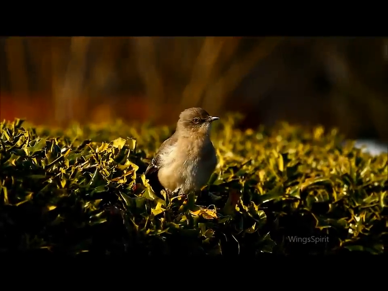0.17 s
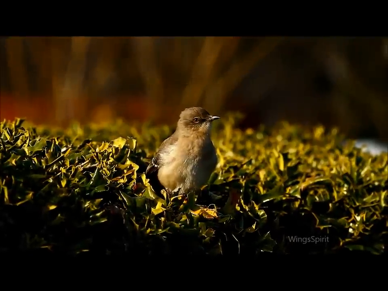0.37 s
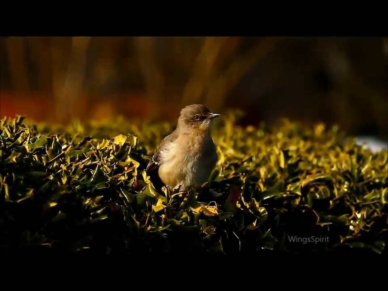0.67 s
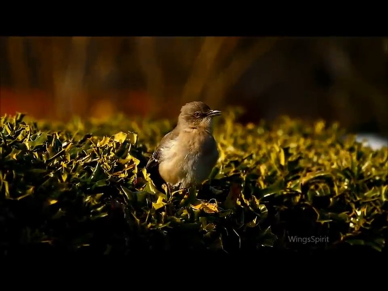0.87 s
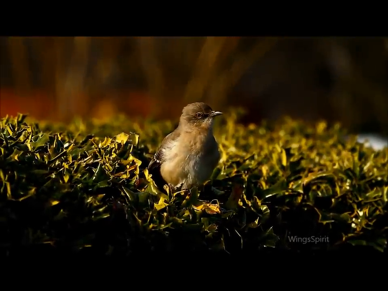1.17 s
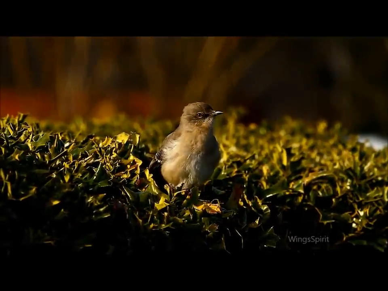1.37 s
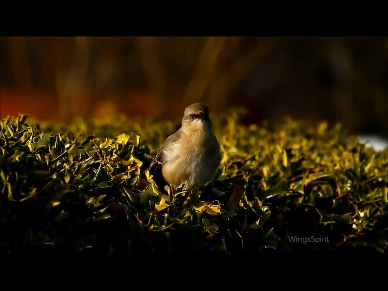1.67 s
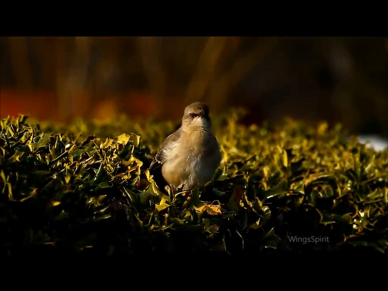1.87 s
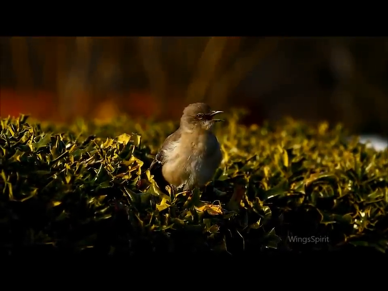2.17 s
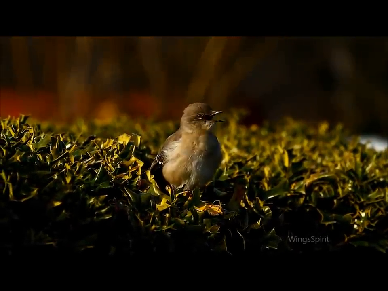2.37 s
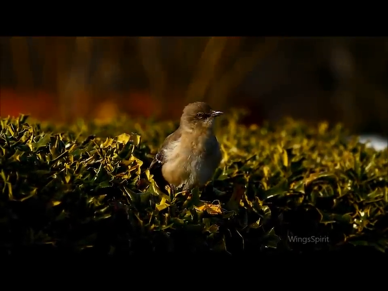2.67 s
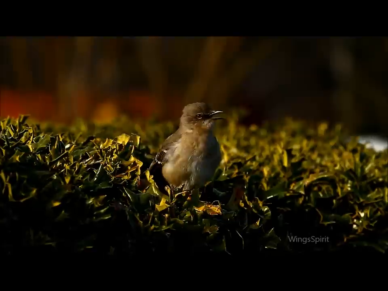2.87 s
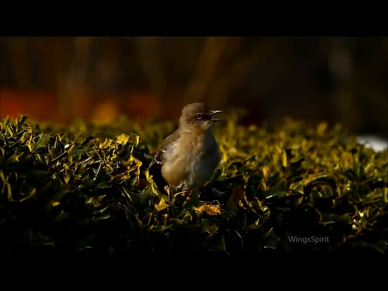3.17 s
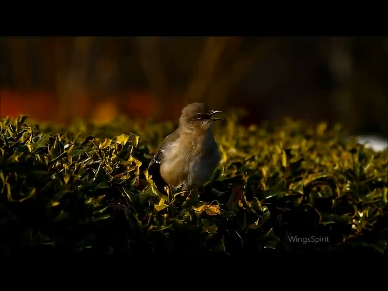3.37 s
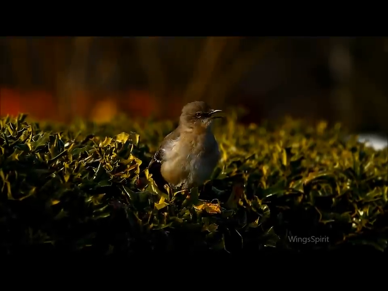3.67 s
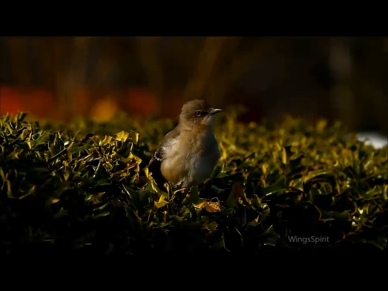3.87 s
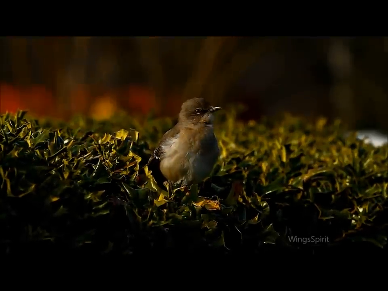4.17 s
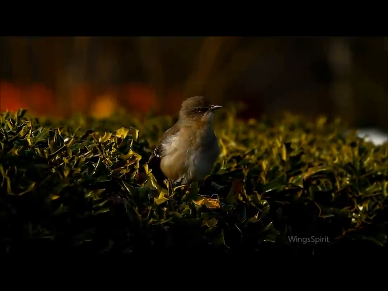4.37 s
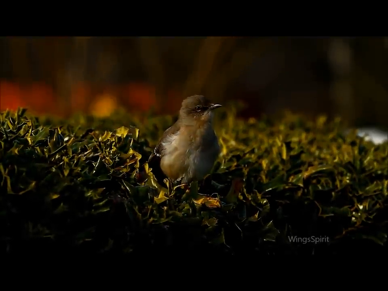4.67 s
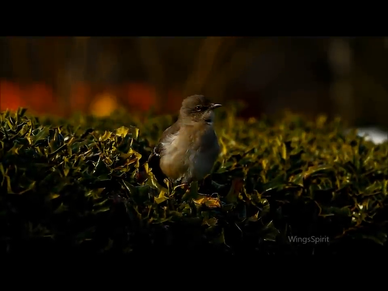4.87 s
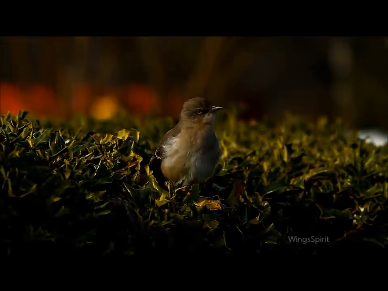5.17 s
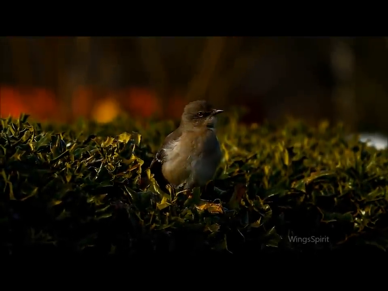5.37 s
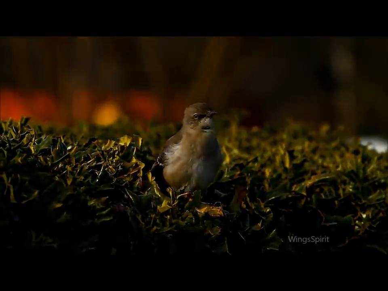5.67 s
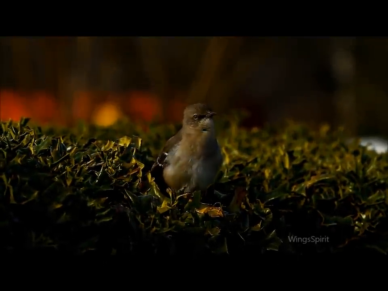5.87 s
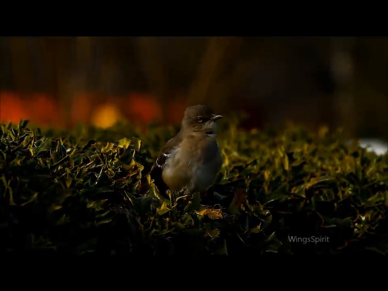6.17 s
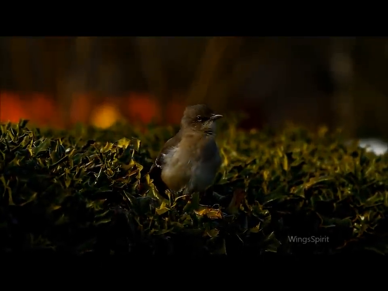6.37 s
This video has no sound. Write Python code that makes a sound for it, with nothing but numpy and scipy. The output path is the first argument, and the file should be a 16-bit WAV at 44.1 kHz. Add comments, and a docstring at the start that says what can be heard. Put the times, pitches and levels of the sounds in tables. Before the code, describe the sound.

A mockingbird perched on a hedge sings close to the microphone. Five sharp chips, mixed with two mellow whistles, give way to quick groups of high pips, most ending in a falling slur. Two low buzzes, soft low notes answered by warbles, and two throbbing trills follow, much quieter. Distant traffic rumbles and slowly recedes; a few dull bumps shake the microphone. Open air, slight leafy reflections.

```python
"""Distant traffic rumbles as filtered noise and slowly recedes while a mockingbird on top of a hedge sings:
gliding harmonic tones form sharp chips and two mellow whistles. A few soft bumps, decaying cosines, shake
the microphone, noise ticks snap among the twigs and a thin sine whistle sounds briefly above the song.
Runs of high pips and slurs follow, then low buzzes, soft notes with warbles, and trills.
Dying clouds of reflections from leaves and trees, and one from the ground, trail each note."""
import sys
import numpy as np
from scipy import signal
from scipy.fft import rfft, irfft
from scipy.io import wavfile
from scipy.ndimage import uniform_filter1d

SR = 44100
rng = np.random.default_rng(int(sys.argv[2]) if len(sys.argv) > 2 else 0)


def unload_audio(sound):
    """Save the sound as a 16-bit wav file, at the path given as the first command line argument."""
    columns = np.transpose(np.atleast_2d(sound))
    # keep every value between -1 and 1, then stretch to whole-number steps
    steps = np.round(np.clip(columns, -1, 1) * 32767)
    wavfile.write(sys.argv[1], SR, steps.astype(np.int16))


N = 287532
CUTOFF_HZ = 15700   # upper limit of the overtones and of the whole sound

# overtone strength after throat and beak, in the high notes; each note adds its own overtone gain:
# (frequency [Hz], gain relative to the fundamental [dB])
HIGH_OVERTONES = [(7500, -14.5), (9000, -19.5), (10200, -30.5), (12000, -30.5), (14000, -16.5),
                  (15300, -38)]
# the same for the low notes and warbles: (frequency [Hz], gain relative to the fundamental [dB])
LOW_NOTE_OVERTONES = [(4000, -34), (6500, -35), (9300, -38), (10900, -22), (12400, -33), (14000, -24),
                      (16000, -31)]


def from_db(db):
    """Logarithmic level: 20 dB is a factor of ten in amplitude."""
    return 10 ** (np.asarray(db) / 20)


def rms_one(x):
    """Normalisation of the mean power to one."""
    return x / np.sqrt(np.mean(x ** 2) + 1e-20)


def in_time(rows):
    """Linear interpolation: each column of a curve at every sample."""
    s, *columns = np.transpose(rows)
    return [np.interp(np.arange(N) / SR, s, column) for column in columns]


def drift(rate, size):
    """Low-passed random fluctuation: noise averaged twice over 1/rate seconds, with spread 1."""
    width = max(2, int(SR / rate))
    noise = rng.standard_normal(size + SR)
    slow = uniform_filter1d(uniform_filter1d(noise, width), width)
    return rms_one(slow)[SR // 2:SR // 2 + size]


def coloured_noise(spectrum):
    """Spectral shaping: white noise weighted in frequency, then scaled to rms 1."""
    table_hz, table_db = np.transpose(spectrum)
    hz = np.maximum(np.fft.rfftfreq(N, 1 / SR), 1)
    octaves_outside = np.abs(np.log2(hz / np.clip(hz, table_hz[0], table_hz[-1])))
    # beyond the table the spectrum falls by 24 dB per octave
    gain_db = np.interp(np.log(hz), np.log(table_hz), table_db) - 24 * octaves_outside
    return rms_one(irfft(rfft(rng.standard_normal(N)) * from_db(gain_db), N))


def add(out, t, sound):
    """Superposition: mix a sound in at its sample times."""
    at = np.round(t * SR).astype(int)
    inside = (at >= 0) & (at < N)
    out[at[inside]] += sound[inside]


def sample_times(start, end):
    """Uniform sampling of the time between two moments."""
    first = int(start * SR)
    return np.arange(first, max(int(end * SR), first + 2)) / SR


def envelope_db(t, attack, release, depth_db=20):
    """Amplitude envelope: attack, hold and release, in dB relative to the full level."""
    missing_attack = np.maximum(1 - (t - t[0]) / attack, 0)
    missing_release = np.maximum(1 - (t[-1] - t) / release, 0)
    return -depth_db * (missing_attack ** 2 + missing_release ** 2)


def near(hz, centre_hz, width_hz):
    """Gaussian resonance weight: 1 at a pitch, falling to 0 on both sides."""
    return np.exp(-((hz - centre_hz) / width_hz) ** 2)


def arch(s, top_hz, level_db, half, droop, fade_db, lean_db=0, flatness=2.53, shoulder=0.91):
    """Pressure-driven pitch: one push of air lifts pitch and loudness in a round arch; gives times, Hz, dB."""
    t = sample_times(s - half, s + half)
    place = (t - s) / half   # -1 to 1
    away = np.tanh((np.abs(place) / shoulder) ** flatness)
    hz = top_hz * (1 - droop * away)
    db = level_db - fade_db * np.abs(place) ** 1.6 - lean_db * place ** 3   # positive lean: louder on the rise
    return t, hz, db


def syrinx(hz, level_db, overtones, beak_db, jitter, shimmer_db, mistuning_db=0):
    """Source and filter: an unsteady membrane's overtones slide through throat resonances and out of the beak."""
    size = len(hz)
    hz = uniform_filter1d(hz, size=96, mode="nearest") * (1 + jitter * drift(1660, size))
    phase = 2 * np.pi * np.cumsum(hz) / SR
    tone = np.sin(phase) * from_db(-mistuning_db)   # the fundamental weakens as it leaves the throat's tuning
    for k in range(2, 9):
        overtone_db = beak_db + np.interp(k * hz, *np.transpose(overtones))
        tone += from_db(overtone_db) * np.sin(k * phase) * (k * hz < CUTOFF_HZ)
    edges = signal.windows.tukey(size, min(1, .004 * SR / size))   # 2 ms fade at each end
    return np.sqrt(2) * tone * edges * from_db(level_db + shimmer_db * drift(203, size))


def traffic(rumble_gain_db=3, roar_gain_db=0.5, waver_hz=8):
    """Broadband and narrowband noise: engine rumble with two wavering drones, under a broad roar of tyres."""
    # levels before the two gains are added: (time [s], rumble level [dB], tyre roar level [dB])
    traffic_levels = [(0.0, -33.5, -31.5), (1.07, -35.5, -34), (1.72, -40, -34.5), (2.63, -43.5, -37),
                      (3.19, -42, -37), (3.72, -44.5, -39), (4.34, -41, -37.5), (6.36, -47.5, -43.5),
                      (6.52, -46.5, -42.5)]
    # engine noise spectrum: (frequency [Hz], relative density [dB per Hz])
    rumble_spectrum = [(28, -12), (45, -10.5), (70, -6), (110, 2), (140, -3), (175, 0.5), (230, -5.5),
                       (300, -10.5), (400, -15.5)]
    # tyre noise spectrum: (frequency [Hz], relative density [dB per Hz])
    roar_spectrum = [(200, -10), (330, -3), (550, -0.5), (850, 2.5), (1200, -1), (1700, -5), (2400, -14),
                     (3300, -20), (5000, -25.5), (8000, -35), (12000, -35), (15500, -40.5)]
    # engine notes within the rumble: (frequency [Hz], level relative to the rumble noise [dB])
    engine_notes = [(110, -11), (170, -17.5)]
    rumble_db, roar_db = in_time(traffic_levels)
    engines = coloured_noise(rumble_spectrum)
    for hz, db in engine_notes:
        phase = 2 * np.pi * hz * np.arange(N) / SR
        # independent slow sine and cosine parts make a narrow band of noise
        engines += from_db(db) * (drift(waver_hz, N) * np.sin(phase) + drift(waver_hz, N) * np.cos(phase))
    rumble = from_db(rumble_db + rumble_gain_db + 1.25 * drift(6.6, N)) * engines
    roar = from_db(roar_db + roar_gain_db + 0.18 * drift(14.7, N)) * coloured_noise(roar_spectrum)
    return rumble + roar


def chips(swell_s=.006, closing_db_per_s=350, under_ratio=.72, under_db=-13, under_s=0.0076):
    """Rapid frequency sweep: up over two octaves, then down louder as the beak closes, briefly in two voices."""
    # the chips, end pitch before the sag: (time of the top [s], top pitch [Hz], end pitch [Hz], level [dB],
    # upsweep below that level [dB], overtone gain [dB])
    chip_notes = [(0.063, 6300, 3430, -17, 7, -7), (0.347, 6670, 4000, -11.5, 14.5, -6.5),
                  (0.755, 6440, 3640, -13, 11, -5.5), (1.2532, 6340, 3730, -14, 9, -5.5),
                  (1.56, 6280, 3610, -15.5, 13, -7)]
    # throat and beak: (frequency [Hz], gain relative to the fundamental before the overtone gain [dB])
    chip_overtones = [(6000, -19), (8000, -0.5), (10000, -20), (11500, -4), (13200, -1), (14500, -35),
                      (16000, -51)]
    lead_s, tail_s = .018, 0.028   # heard before and after the top
    rise_s, settle_s, sag_hz_per_s = .0115, .0068, 7100
    out = np.zeros(N)
    for s, top_hz, end_hz, level_db, softer_db, beak_db in chip_notes:
        t = sample_times(s - lead_s, s + tail_s)
        before, after = np.maximum(s - t, 0), np.maximum(t - s, 0)
        height = np.exp(-(after / settle_s) ** 1.22) - (before / rise_s) ** 1.4
        hz = end_hz * (top_hz / end_hz) ** height - sag_hz_per_s * after
        swell_db = -softer_db * (1 - np.minimum(after / swell_s, 1) ** 2)
        db = level_db + swell_db + envelope_db(t, attack=0.012, release=0.034)
        closing_db = beak_db - closing_db_per_s * after
        add(out, t, syrinx(hz, db, chip_overtones, closing_db, jitter=.028, shimmer_db=1.6))
        # the other side of the syrinx falls below the first
        both = (t > s) & (t < s + under_s)
        db = level_db + under_db + envelope_db(t[both], attack=0.001, release=0.0014)
        under_hz = under_ratio * hz[both]
        add(out, t[both], syrinx(under_hz, db, chip_overtones, beak_db, jitter=.028, shimmer_db=1.6))
    return out


def rasp(voice, level_db):
    """Flow turbulence: noise in the syrinx follows the strength of the note."""
    # turbulence spectrum: (frequency [Hz], relative density [dB per Hz])
    rasp_spectrum = [(3000, -5), (6000, -6), (9000, -3), (11000, -12), (13500, -3.5), (15500, -10)]
    strength = np.sqrt(np.abs(uniform_filter1d(voice ** 2, size=128)))
    return strength * from_db(level_db) * coloured_noise(rasp_spectrum)


def scatter(x, delay, t60, level_db):
    """Diffuse reverberation: a cloud of small reflections dies exponentially."""
    t = np.arange(SR) / SR
    echoes = rng.standard_normal(SR) * np.exp(-np.log(1000) * t / t60) * (t > delay)
    unit_energy = echoes / np.sqrt(np.sum(echoes ** 2) + 1e-20)
    return from_db(level_db) * signal.fftconvolve(x, unit_energy)[:N]


def ground_echo(x, delay, level_db):
    """Specular reflection: the ground returns one delayed, weaker copy."""
    return from_db(level_db) * np.interp(np.arange(N) - delay * SR, np.arange(N), x, left=0)


def bumps(low_hz=38, soft_hz=370):
    """Damped oscillation: a dull tap and a few cycles of ringing on the microphone."""
    # knocks, levels before the filters: (time [s], starting level [dB], pitch [Hz], 60 dB decay time [s])
    knocks = [(0.492, -16, 139, 0.057), (0.61, -8.5, 88, 0.037), (0.619, -27, 172, .03),
              (0.671, -18, 238, 0.057), (0.685, -9, 197, 0.034), (0.812, -18.5, 60, 0.06),
              (0.843, -25, 55, .07), (1.049, -9, 154, 0.025), (3.95, -19.5, 155, 0.046),
              (4.05, -17.5, 94, 0.06), (4.061, -15.5, 182, 0.048), (4.393, -20.5, 71, 0.033),
              (4.655, -25.5, 147, 0.097)]
    out = np.zeros(N)
    for s, db, hz, t60 in knocks:
        t = sample_times(s, s + 2 * t60)
        decay = np.exp(-np.log(1000) * (t - s) / t60)
        add(out, t, from_db(db) * decay * np.cos(2 * np.pi * hz * (t - s)))
    out = signal.sosfilt(signal.butter(2, low_hz, "high", fs=SR, output="sos"), out)
    return signal.sosfilt(signal.butter(6, soft_hz, fs=SR, output="sos"), out)


def ticks(t60=0.022):
    """Impulsive noise: faint dry snaps among the twigs die exponentially at once."""
    # snaps: (time [s], starting level [dB])
    snaps = [(0.56, -40), (.583, -40), (5.202, -38.5)]
    # spectrum of a snap: (frequency [Hz], relative density [dB per Hz])
    snap_spectrum = [(3800, -6), (4600, 7), (6500, -3), (9000, -32)]
    envelope = np.zeros(N)
    for s, db in snaps:
        t = sample_times(s, s + t60)
        add(envelope, t, from_db(db) * np.exp(-np.log(1000) * (t - s) / t60))
    return envelope * coloured_noise(snap_spectrum)


def whistles(beak_db=-9):
    """Frequency glide: two slow, mellow notes; the second starts in two voices."""
    # one contour for each note: (time [s], pitch [Hz], level [dB])
    contours = [
        [(0.855, 3490, -37.5), (0.877, 3713, -22), (0.949, 3360, -35), (0.997, 3430, -36.5), (1.091, 3844, -23),
         (1.137, 3940, -23), (1.16, 3730, -59)],
        [(1.68, 4072, -34.5), (1.684, 4070, -27.5), (1.712, 3850, -24), (1.754, 3424, -33.5),
         (1.836, 3520, -40), (1.87, 3444, -37.5), (1.9, 3300, -45)],
    ]
    # short arch from the second side of the syrinx: (time of the middle [s], top pitch [Hz], level [dB],
    # half length [s])
    second_voice = (1.689, 3460, -27, .011)
    # throat and beak: (frequency [Hz], gain relative to the fundamental before the overtone gain [dB])
    whistle_overtones = [(7000, -8), (8000, -9), (10000, -26), (11500, -18), (14000, -26.5), (16000, -30)]
    out = np.zeros(N)
    for contour in contours:
        s, contour_hz, contour_db = np.transpose(contour)
        t = sample_times(s[0], s[-1])
        hz, db = np.interp(t, s, contour_hz), np.interp(t, s, contour_db)
        add(out, t, syrinx(hz, db, whistle_overtones, beak_db, jitter=.0025, shimmer_db=.9))
    t, hz, db = arch(*second_voice, droop=0.15, fade_db=21)
    add(out, t, syrinx(hz, db, whistle_overtones, beak_db, jitter=.0025, shimmer_db=.9))
    return out


def thin_whistle(pitch_hz=9027):
    """Pure tone: a narrow, steady pitch swells three times, ever weaker."""
    # level curve: (time [s], level [dB])
    swells = [(1.29, -57), (1.38, -35.5), (1.458, -23.5), (1.634, -45.5), (1.786, -33), (1.834, -56),
              (1.872, -44), (1.896, -61), (2.05, -57)]
    out = np.zeros(N)
    s, db = np.transpose(swells)
    t = sample_times(s[0], s[-1])
    hz = np.full(len(t), pitch_hz)   # every overtone lies above the cutoff and is left out
    add(out, t, syrinx(hz, np.interp(t, s, db), HIGH_OVERTONES, 0, jitter=.0002, shimmer_db=1.7))
    return out


def pips(droop=0.14, fade_db=22, lean_db=3):
    """Pressure-driven pitch: runs of high, arched notes."""
    # the pips: (time of the middle [s], top pitch [Hz], level [dB], half length [s], overtone gain [dB])
    pip_notes = [(2.007, 4970, -11.5, .02, 2.5), (2.062, 5016, -13, .021, 3), (2.115, 5057, -9.5, .026, 4),
                 (2.415, 4944, -12.5, .021, 7), (2.47, 5025, -10.5, .022, 5),
                 (2.528, 5040, -12, 0.033, 2.5), (2.754, 5006, -12.5, 0.017, -1.5),
                 (2.816, 5024, -10.5, 0.013, 0), (2.877, 5040, -11, 0.014, -0.5),
                 (3.183, 4994, -13, 0.02, 9.5), (3.241, 5037, -12.5, .021, 5.5),
                 (3.298, 5030, -12, .026, 0.5), (3.601, 5020, -13, .018, 1.5),
                 (3.663, 5070, -14, 0.02, 1.5), (3.734, 5017, -12, 0.014, 1.5),
                 (3.798, 4996, -18, 0.017, -0.5)]
    out = np.zeros(N)
    for s, top_hz, level_db, half, beak_db in pip_notes:
        t, hz, db = arch(s, top_hz, level_db, half, droop, fade_db, lean_db)
        add(out, t, syrinx(hz, db, HIGH_OVERTONES, beak_db, jitter=.0012, shimmer_db=1))
    return out


def slurs(round_s=0.0044, waver=0.0026):
    """Falling glide: a note bends over into a straight, slightly wavering fall and fades with its pitch."""
    # long notes among the runs of pips: (time of the top [s], lead-in [s], fall [s], start pitch [Hz],
    # top pitch [Hz], end pitch [Hz], level [dB], fade [dB per octave], overtone gain [dB])
    slur_notes = [(2.171, 0.042, 0.16, 4570, 5140, 3660, -17, 53, 2.5),
                  (2.571, 0.026, 0.073, 4870, 4770, 3920, -24, 27, 3),
                  (2.942, .033, 0.11, 4800, 5047, 3960, -18, 67, 0),
                  (3.362, .044, 0.11, 4620, 4800, 3640, -26.5, 35, 2.5)]
    dip_hz, dip_width_hz, dip_depth_db = 4380, 36, 15.5   # every fundamental weakens as it falls past this pitch
    out = np.zeros(N)
    for s, lead, fall, start_hz, top_hz, end_hz, level_db, fade_db, beak_db in slur_notes:
        t = sample_times(s - lead, s + fall)
        fallen = (np.hypot(t - s, round_s) - round_s) / (np.hypot(fall, round_s) - round_s)
        lead_in = (start_hz / top_hz) ** (((t - s) / lead) ** 2)
        hz = top_hz * np.where(t < s, lead_in, (end_hz / top_hz) ** fallen)
        db = level_db + fade_db * np.log2(hz / top_hz) + envelope_db(t, attack=0.028, release=0.023)
        dip_db = dip_depth_db * near(hz, dip_hz, dip_width_hz)
        hz = hz * (1 + waver * drift(90, len(t)))
        voice = syrinx(hz, db, HIGH_OVERTONES, beak_db, jitter=0.00063, shimmer_db=2, mistuning_db=dip_db)
        add(out, t, voice)
    return out


def buzzes(beak_db=-2):
    """Frequency modulation: pulses snap the pitch up and let it slide back; a rough second voice frays the end."""
    # low rising buzzes, pitches before the pulses: (start [s], length [s], start pitch [Hz], top pitch [Hz],
    # level [dB])
    buzz_notes = [(4.093, 0.12, 1990, 2483, -30), (4.491, 0.12, 1915, 2480, -31)]
    # throat and beak: (frequency [Hz], gain relative to the fundamental before the overtone gain [dB])
    buzz_overtones = [(4500, -27), (5600, -29), (7200, -23), (9000, -42), (11200, -26), (12300, -30),
                      (14000, -25), (16000, -30)]
    pulses_per_s, depth, gap_db = 65, .075, 6
    rise_s, attack_s, release_s = 0.083, 0.011, 0.039
    fray_start_hz, fray_end_hz, fray_db = 3900, 2850, -48.5   # the second voice falls as a buzz ends
    fray_lead_s, fray_tail_s = .04, 0.0167   # before and after the buzz's end
    out = np.zeros(N)
    for s, length, start_hz, top_hz, level_db in buzz_notes:
        t = sample_times(s, s + length)
        pulse_place = (pulses_per_s * (t - s) + .05 * drift(60, len(t))) % 1
        snap = 1 - 2 * pulse_place
        grown = np.clip((t - s) / rise_s, 0, 1)
        hz = top_hz - (top_hz - start_hz) * (1 - (t - s) / rise_s) ** 2
        hz = hz * (1 + depth * np.sqrt(grown) * (snap + np.maximum(snap, 0) ** 3))
        db = level_db + envelope_db(t, attack_s, release_s) - gap_db * grown * snap ** 2
        add(out, t, syrinx(hz, db, buzz_overtones, beak_db, jitter=.025, shimmer_db=1.8))
        t = sample_times(s + length - fray_lead_s, s + length + fray_tail_s)
        snap = 1 - 2 * (pulses_per_s * (t - s) % 1)
        hz = np.geomspace(fray_start_hz, fray_end_hz, len(t)) * (1 + depth * snap)
        db = fray_db + envelope_db(t, attack=.03, release=.012)
        add(out, t, syrinx(hz, db, buzz_overtones, beak_db, jitter=.05, shimmer_db=3))
    return out


def low_notes():
    """Exponential relaxation: a soft note slides down and settles on its pitch."""
    # the low notes: (start [s], end pitch [Hz], level [dB], overtone gain [dB])
    soft_notes = [(4.89, 1778, -32.5, -16), (5.411, 1815, -33.5, -14), (5.741, 1815, -32.5, -14)]
    length_s, slide, settle_s = 0.065, 0.179, .02   # starts higher by the share "slide"
    out = np.zeros(N)
    for s, end_hz, level_db, beak_db in soft_notes:
        t = sample_times(s, s + length_s)
        hz = end_hz * (1 + slide * np.exp(-(t - s) / settle_s))
        db = level_db + envelope_db(t, attack=0.014, release=0.032)
        add(out, t, syrinx(hz, db, LOW_NOTE_OVERTONES, beak_db, jitter=.004, shimmer_db=2.3))
    return out


def warbles(swing_db=3.0):
    """Vibrato: a sinking note swings fast, starts ragged and thins at the top of each swing."""
    # the answer to each low note: (start [s], length [s], middle pitch [Hz], level [dB],
    # vibrato rate [swings per s], overtone gain [dB])
    warble_notes = [(4.963, 0.094, 2028, -31.5, 63, -5.5), (5.481, 0.088, 2094, -29.5, 47, 0),
                    (5.798, 0.096, 2003, -29, 54, -4)]
    sag_hz_per_s, depth = 2300, 0.03
    onset_depth, steady_s = 0.047, .025   # wider, rougher swings at first
    out = np.zeros(N)
    for s, length, middle_hz, level_db, rate, beak_db in warble_notes:
        t = sample_times(s, s + length)
        swing = -np.cos(2 * np.pi * rate * (t - s))
        roughness = 1 + swing + .5 * drift(300, len(t))
        unsteady = onset_depth * np.exp(-(t - s) / steady_s) * roughness
        sinking_hz = middle_hz - sag_hz_per_s * (t - s - length / 2)
        hz = sinking_hz * (1 + depth * swing + unsteady)
        db = level_db + envelope_db(t, attack=0.036, release=0.033)
        voice = syrinx(hz, db, LOW_NOTE_OVERTONES, beak_db, jitter=0.0047, shimmer_db=1.5,
                       mistuning_db=swing_db * swing)
        add(out, t, voice)
    return out


def trills(dip_hz=2250, dip_width_hz=180, dip_db=8.0, early_db=-3, accent_beak_db=0):
    """Modulation across a weak spot of the throat: a high accent, then throbbing swings that sink and narrow."""
    # the trills; the accent adds its own level: (time of the accent [s], length [s], accent pitch [Hz],
    # resting pitch [Hz], level [dB], overtone gain [dB])
    trill_notes = [(6.045, 0.273, 2950, 2060, -31.5, -12.5), (6.379, .2, 3090, 2132, -32.5, -7)]
    # accent: (frequency [Hz], gain relative to the fundamental [dB])
    accent_overtones = [(6000, -27), (9000, -31), (12000, -38), (15000, -30)]
    # swings: (frequency [Hz], gain relative to the fundamental before the overtone gain [dB])
    trill_overtones = [(4000, -30), (5000, -16), (6500, -37), (7500, -23), (9000, -43), (11000, -19),
                       (12500, -32), (14000, -19), (16000, -28)]
    swings_per_s, settle_s = 20, .08
    lift, depth, extra_depth = 0.13, 0.05, 0.097   # shares of pitch; lift and extra depth die away
    accent_half_s, accent_db = 0.015, 6
    out = np.zeros(N)
    for s, length, accent_hz, rest_hz, level_db, beak_db in trill_notes:
        t, hz, db = arch(s, accent_hz, level_db + accent_db, accent_half_s, droop=.21, fade_db=16, lean_db=-3)
        add(out, t, syrinx(hz, db, accent_overtones, accent_beak_db, jitter=0.013, shimmer_db=1.5))
        t = sample_times(s + accent_half_s, s + length)
        effort = np.exp(-(t - t[0]) / settle_s)
        swing = -(depth + extra_depth * effort) * np.cos(2 * np.pi * swings_per_s * (t - t[0]))
        hz = rest_hz * (1 + lift * effort) * (1 + swing)
        db = level_db + early_db * effort + envelope_db(t, attack=0.014, release=.02)
        weak_db = dip_db * near(hz, dip_hz, dip_width_hz)
        voice = syrinx(hz, db, trill_overtones, beak_db, jitter=.005, shimmer_db=.6, mistuning_db=weak_db)
        add(out, t, voice)
    return out


def scene():
    """Superposition: the song, its echoes from the hedge, the ground and the trees, and the background."""
    sharp, high = chips(), pips()
    song = sharp + rasp(sharp, level_db=-24)
    song += high + rasp(high, level_db=-32)
    song += slurs() + whistles() + buzzes() + low_notes() + warbles() + trills()
    # lower pitches spread sideways into the leaves, while the highest are beamed ahead
    sideways = signal.sosfilt(signal.butter(6, 4400, fs=SR, output="sos"), song)
    hedge = scatter(sideways, delay=.004, t60=.13, level_db=-14)
    hedge += scatter(song, delay=.004, t60=.12, level_db=-23)
    ground = ground_echo(song, delay=.017, level_db=-21)
    trees = scatter(song, delay=0.031, t60=0.93, level_db=-37)
    background = traffic() + bumps() + ticks() + thin_whistle()
    return (song + hedge + ground + trees + background)[None]


def record(dry):
    """Band limitation: an elliptic low-pass cuts the top steeply."""
    return signal.sosfilt(signal.ellip(12, .1, 80, CUTOFF_HZ, fs=SR, output="sos"), dry)


dry = scene()
out = record(dry)
unload_audio(out)
```